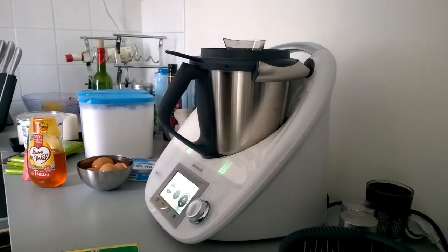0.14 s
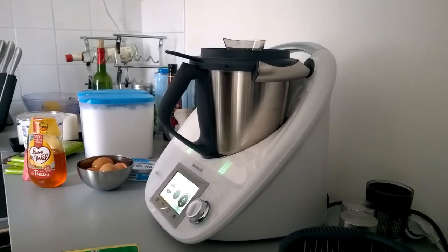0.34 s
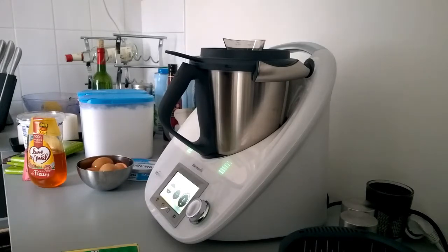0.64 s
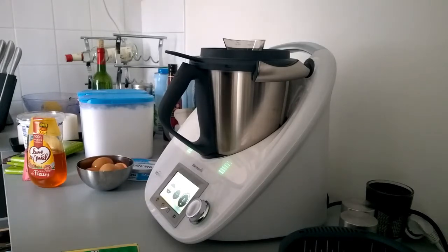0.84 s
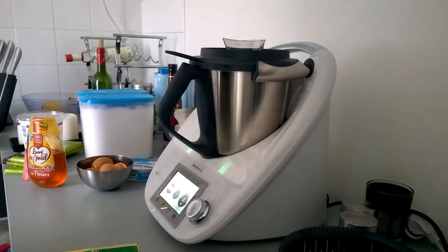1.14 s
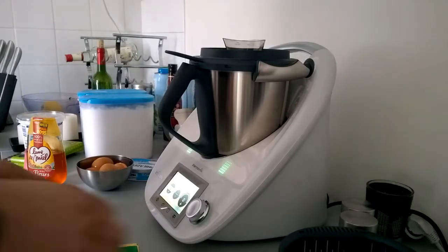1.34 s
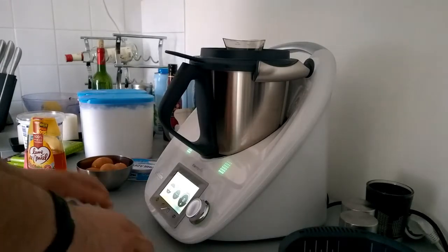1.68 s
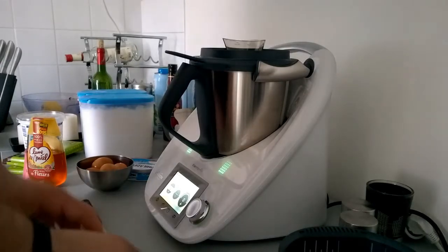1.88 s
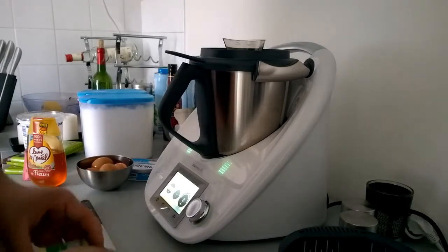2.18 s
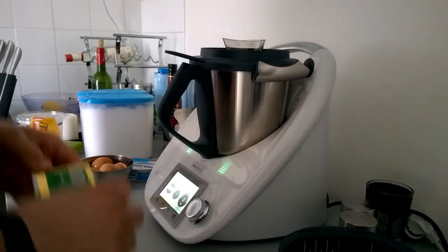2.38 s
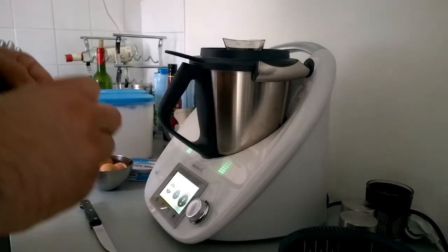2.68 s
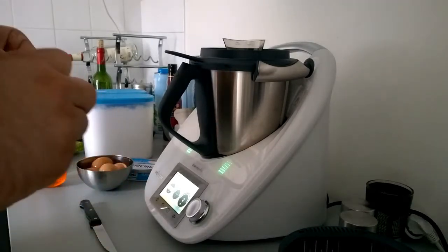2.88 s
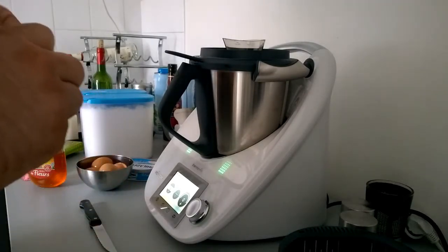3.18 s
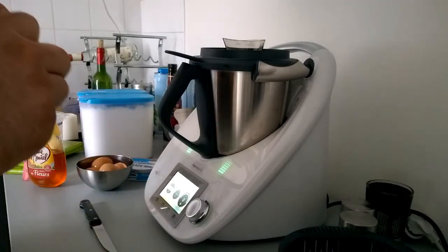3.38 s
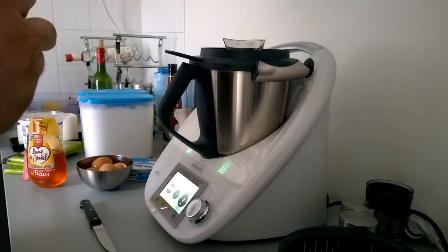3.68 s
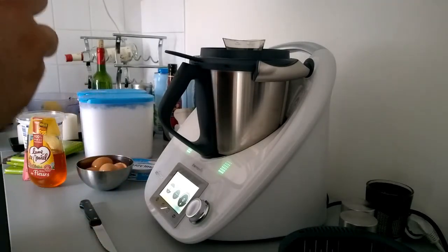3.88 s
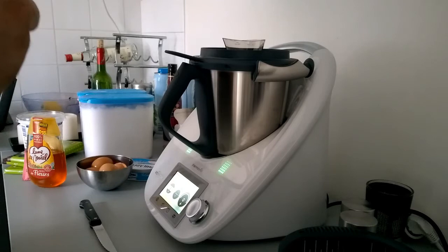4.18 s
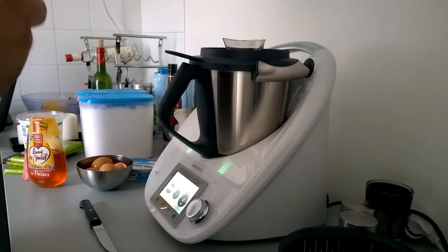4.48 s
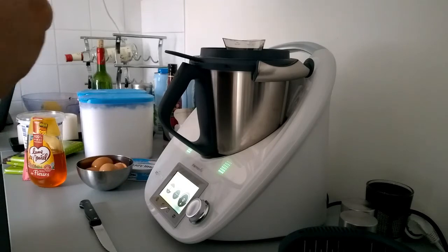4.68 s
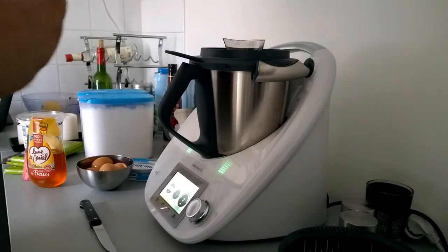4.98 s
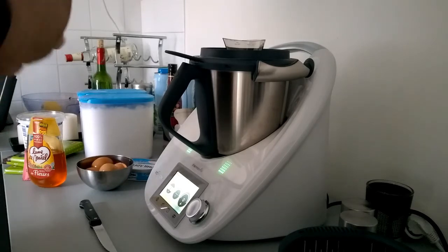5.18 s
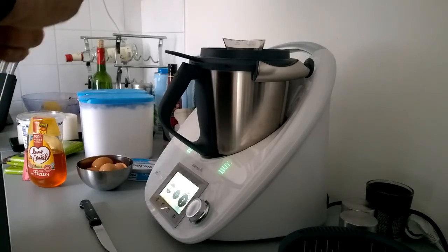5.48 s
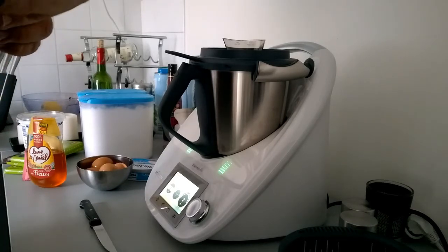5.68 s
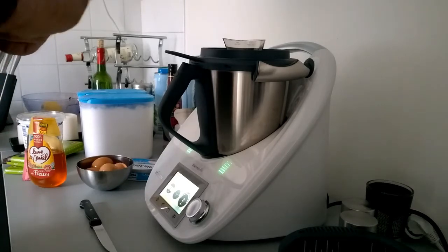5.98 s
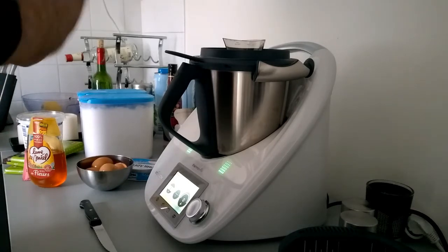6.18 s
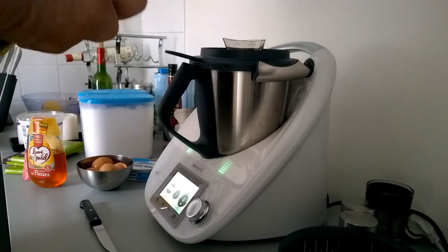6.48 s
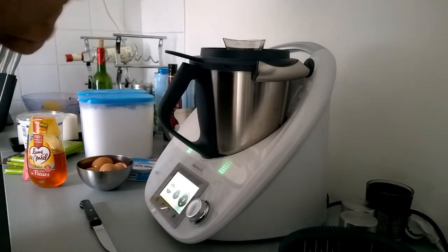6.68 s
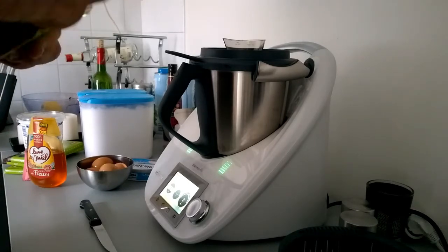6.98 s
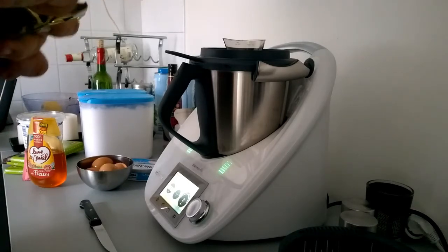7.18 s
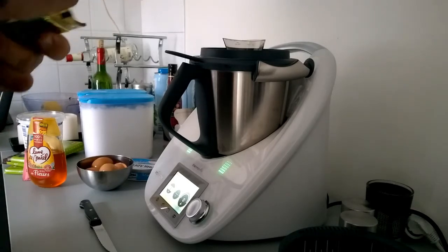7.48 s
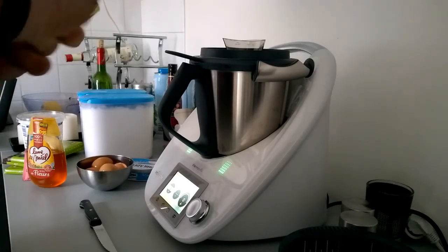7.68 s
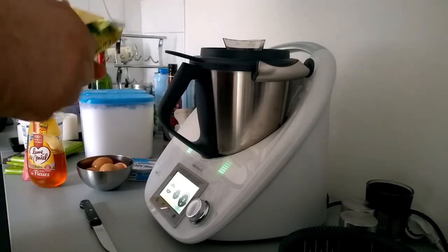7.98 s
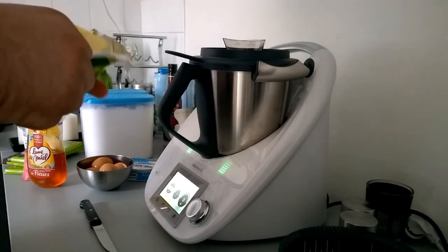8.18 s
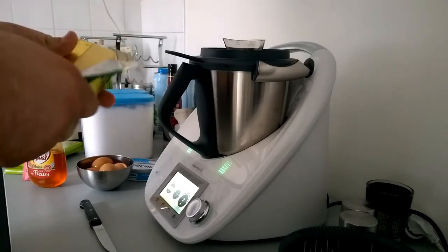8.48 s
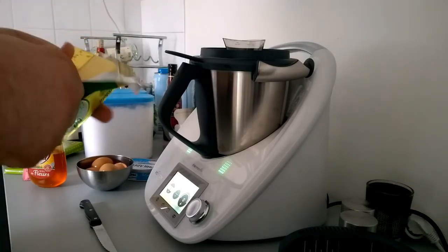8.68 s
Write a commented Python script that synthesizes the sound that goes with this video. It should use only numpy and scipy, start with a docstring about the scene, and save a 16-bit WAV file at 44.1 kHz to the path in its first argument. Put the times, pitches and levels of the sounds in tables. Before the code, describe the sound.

Wooden drawer knocks and steel chinks, a short slide on the worktop, then long uneven crackling of a foil wrapper, close up in a tiled room.

```python
"""Fingers work a stiff foil wrapper open: sharp single creases snap over a finer crackle of tiny ones.
Before that a cutlery drawer is pulled, rummaged in and shut, and a knife and a packet knock and slide on the
counter: short bursts ring wood and steel, streams of tiny contacts scrape, and a low rumble swells with a slide.
The tiled kitchen hums low and echoes the handled things; two close microphones hear it, the left a little earlier."""
import sys
import numpy as np
from scipy import signal
from scipy.fft import rfft, irfft, next_fast_len
from scipy.io import wavfile
from scipy.ndimage import map_coordinates

SR = 44100
rng = np.random.default_rng(int(sys.argv[2]) if len(sys.argv) > 2 else 0)


def unload_wav(signal):
    """Save mono or channel-first audio to the path in sys.argv[1] as 16-bit WAV at rate SR, clipped to [-1, 1]."""
    wavfile.write(
        sys.argv[1],
        SR,
        np.round(np.clip(np.atleast_2d(signal).T, -1, 1) * 32767).astype(np.int16),
    )


def linear_from_db(decibels):
    """Turn decibels (scalar or array-like) into linear amplitude factors; 0 gives 1."""
    return 10 ** (np.asarray(decibels, float) / 20)


N = 390285  # samples


def unit(x):
    """Scales a sound to rms 1."""
    return x / np.sqrt(np.mean(x ** 2) + 1e-20)


def peak1(x):
    """Scales a sound to peak 1."""
    return x / np.abs(x).max()


def power_db(*levels_db):
    """Level of unrelated sounds together: their powers add."""
    return 10 * np.log10(sum(linear_from_db(db) ** 2 for db in levels_db) + 1e-14)


def along(points, hz):
    """Reads a curve of (f/Hz, value) points on a log frequency axis."""
    f, v = np.transpose(points)
    return np.interp(np.log(hz + 1), np.log(f + 1), v)


def curves(rows, silent=-120):
    """Draws straight lines through the rows: one value per sample for each column after the time."""
    s, *cols = np.transpose(rows)
    return [np.interp(np.arange(N) / SR, s, c, silent, silent) for c in cols]


def wobble(rate):
    """A smooth random curve with rate knots a second."""
    coarse = np.arange(0, N + 32, 32)
    knots = rng.standard_normal(int(N * rate / SR) + 4)
    return np.interp(np.arange(N), coarse, map_coordinates(knots, [coarse * rate / SR]))


def filtered(x, response):
    """Multiplies the spectrum of x by a complex response of frequency."""
    m = next_fast_len(N + SR // 2)
    return irfft(rfft(x, m) * response(np.fft.rfftfreq(m, 1 / SR)), m)[..., :N]


def band(x, lo_hz, hi_hz):
    """Keeps mainly the part of x between two frequencies."""
    return signal.sosfilt(signal.butter(2, [lo_hz, hi_hz], "bandpass", fs=SR, output="sos"), x)


def struck(burst, hz, q):
    """A short burst rings one damped resonance, peak 1."""
    return peak1(signal.lfilter(*signal.iirpeak(hz, q, SR), burst))


def rung(x, modes):
    """Sends x through side-by-side resonances of (f/Hz, width f/Hz, level/dB), with alternating signs."""
    out = 0
    for k, (hz, width, db) in enumerate(modes):
        out = out + (-1) ** k * linear_from_db(db) * signal.lfilter(*signal.iirpeak(hz, hz / width, SR), x)
    return out


def grains(spectrum, rate, spread_db, smooth):
    """Random tiny contacts of uneven size, rate a second, over a share of smooth friction noise; rms 1."""
    happens, sign, size = rng.random((3, N))
    ticks = (happens < rate / SR) * np.sign(sign - .5) * linear_from_db(-spread_db * np.log(size + .003))
    rough = unit(ticks) + smooth * rng.standard_normal(N)
    return unit(filtered(rough, lambda hz: linear_from_db(along(spectrum, hz))))


def dulled(x, db, full_db):
    """Gentle contact is dull: the treble fades as the level falls below full_db."""
    treble = band(x, lo_hz=6500, hi_hz=19000)
    soft = signal.sosfilt(signal.butter(4, 6500, fs=SR, output="sos"), x)
    treble_db = np.clip(0.39 * (db - full_db), -30, 0)
    return linear_from_db(db) * (soft + linear_from_db(treble_db) * treble)


def add(track, s, sound):
    """Lays a sound into the track at s seconds."""
    start = round(s * SR)
    track[start:start + len(sound)] += sound


# how alike diffuse sound is at the two microphones: f/Hz, likeness (1 = the same)
LIKENESS = [(60, 0.86), (290, 0.81), (640, 0.53), (1400, 0), (15000, 0.26)]


def pair(spectrum):
    """Diffuse stereo noise of rms 1: shared and opposite parts mix to set how alike the sides are."""
    def mix(hz):
        turn = np.arccos(np.clip(along(LIKENESS, hz), -1, 1)) / 2
        return linear_from_db(along(spectrum, hz)) * [np.cos(turn), np.sin(turn)]

    mid, side = filtered(rng.standard_normal((2, N)), mix)
    return unit(np.array([mid + side, mid - side]))


# colour of the quiet air noise: f/Hz, relative level/dB
AIR_NOISE = [(20, -14.5), (68, -23), (115, -2.5), (178, -13), (398, -10.5), (477, -9.5), (726, -15.5),
             (795, -15), (1450, -26.5), (1810, -29.5), (2050, -31), (2560, -40.5), (4400, -31.5),
             (6500, -41), (9000, -51.5), (11700, -108), (19800, -120)]
# appliance tones: f/Hz, level/dB before a shared lift and wavering
APPLIANCE_TONES = [(174, -63), (307, -62), (334, -63), (433, -62), (536, -59), (592, -63)]
# low rumble over time, swelling near 1.9 s as things slide on the counter, and mains hum before its lift;
# both then waver: t/s, low rumble level/dB, mains hum level/dB
RUMBLE_AND_MAINS = [(0, -52, -80), (.8, -52, -50.5), (1.25, -67, -50), (1.5, -55, -75), (1.9, -36.5, -62.5),
                    (2.3, -51.5, -64.5), (3, -51, -62.5), (4.4, -52, -67.5), (5.2, -51, -57),
                    (6.2, -55.5, -74), (7.4, -56.5, -64.5), (8.85, -61, -62)]


def hum_and_low_rumble():
    """Air noise, mains hum and wavering appliance tones, and a low rumble that swells with a counter slide."""
    rumble_db, mains_db = curves(RUMBLE_AND_MAINS)
    t = np.arange(N) / SR
    hum = 0
    for hz, db in APPLIANCE_TONES:
        level = linear_from_db(db + 1 + 1.7 * wobble(3.3))
        hum = hum + level * np.sin(2 * np.pi * hz * t + 0.88 * wobble(3.2))
    mains = linear_from_db(mains_db + 3 + 2.5 * wobble(6)) * np.sin(2 * np.pi * 99.5 * t + .9 * wobble(5))
    # f/Hz, relative level/dB: a narrow hump near 71 Hz
    low = pair([(15, -8), (45, -3), (60, -6), (66, -5), (71, 10), (77, -6), (110, -10), (130, -40), (300, -110)])
    rumble = linear_from_db(rumble_db + 0.5 * wobble(3.3)) * low
    return linear_from_db(-51.5) * pair(AIR_NOISE) + rumble + hum + mains


# resonances of cupboard and counter: f/Hz, width f/Hz, level/dB
CUPBOARD = [(96.4, 22, -0.5), (137, 33, -2), (346, 385, -9.5)]
# wooden knocks of drawer and counter, levels before shared offsets:
# t/s, level/dB, panel ring f/Hz, relative thud level/dB, relative crack level/dB
WOOD_KNOCKS = [(.045, -33.5, 430, -29.5, -6), (0.07, -30.5, 990, -5, -24), (.162, -14.5, 380, -30, -20.5),
               (.176, -13, 830, -6, -7.5), (.189, -17.5, 1030, -14, -9.5), (.236, -5.5, 810, -38, -31),
               (.256, -18, 691, -32.5, -3), (.308, -25.5, 820, -25.5, -19), (0.438, -16, 1520, -26, -10),
               (.479, -9, 900, -39, 6.5), (0.491, -10.5, 970, -21, -18.5), (0.566, -27.5, 403, -7.5, 10),
               (.682, -5.5, 1080, -15, -34), (.698, -15.5, 610, -7, -47), (1.372, -46.5, 563, 10.5, -25),
               (1.538, -18, 1080, -5, -2.5), (1.582, -7.5, 1060, -8, -9.5), (1.61, -23.5, 1390, -9, -6),
               (1.625, -21, 1140, 0, -30), (1.763, -8, 1000, -21, -13), (1.8, -22.5, 960, -23, -19),
               (1.824, -21, 935, -14, -17), (1.859, -23, 860, 0, -5), (2.017, -29.5, 1280, -24, -2),
               (2.039, -25.5, 1264, -11, 9)]


def knocks():
    """A hard first touch and a rough contact ring the panel, thud in the cupboard and crack at the edge."""
    out, t = np.zeros(N + SR), np.arange(SR // 8) / SR
    noises = rng.standard_normal((len(WOOD_KNOCKS), len(t)))
    for (s, db, hz, thud_db, crack_db), noise in zip(WOOD_KNOCKS, noises):
        burst = noise * np.exp(-t / .002)  # the contact chatters for about 2 ms
        touch = band(burst + 12 * (t == 0), lo_hz=60, hi_hz=2580)  # wood cushions the blow
        panel = struck(touch, hz, q=3.4) + .5 * peak1(band(touch, lo_hz=285, hi_hz=2515))
        thud = linear_from_db(thud_db + 1) * peak1(rung(touch, CUPBOARD))
        crack = peak1(band(burst, lo_hz=1810, hi_hz=5840))
        crack = crack + 0.33 * peak1(band(burst, lo_hz=6000, hi_hz=16300))
        add(out, s, linear_from_db(db + 4.0) * (panel + thud + linear_from_db(crack_db - 1) * crack))
    return out[:N]


# colour of wood scraping on wood: f/Hz, relative level/dB
SCRAPE_COLOUR = [(150, -46), (250, -18.5), (360, -2.5), (657, -4.5), (793, -3.5), (1460, -0.5),
                 (1780, -34.5), (3000, -23.5), (3900, -59.5), (6600, -120)]
# colour of loose things rattling: f/Hz, relative level/dB
RATTLE_COLOUR = [(1180, -33), (2000, -7.5), (2500, -5.5), (4710, -14), (7190, -17.5), (8330, -14.5),
                 (15100, -17.5), (15800, -37.5)]
# strokes of runners and sliding things, scrape and rattle before their flutter:
# start t/s, length t/s, scrape level/dB, rattle level/dB, counter rumble level/dB
SLIDE_STROKES = [(0.06, 0.22, -40.5, -46.5, -56), (0.188, 0.075, -30, -28, -48),
                 (0.462, 0.031, -23.5, -24, -40), (0.536, 0.092, -32.5, -33, -54),
                 (0.654, 0.2, -43.5, -56.5, -58), (0.895, 0.54, -56, -73, -49.5),
                 (1.362, 0.19, -60, -61.5, -57), (1.605, 0.106, -35.5, -52.5, -33),
                 (1.768, .17, -37, -43, -36), (2.003, 0.069, -51, -40.5, -44),
                 (2.11, 0.083, -56.5, -58, -63)]


def slides():
    """Wood scrapes, loose things rattle, the counter rumbles underneath; each stroke rises, holds and falls."""
    rise_s, fall_s = 0.016, 0.028
    t = np.arange(N) / SR
    start, length, *levels = np.transpose(SLIDE_STROKES)[:, :, None]
    short = t[:3 * SR:40]  # the strokes all lie in the first 3 s
    rise = np.minimum((short - start) / rise_s, 0)
    fall = np.minimum((start + length - short) / fall_s, 0)
    shape_db = 20 * np.log10(np.exp(rise + fall) + 1e-9)
    scrape_db, rattle_db, rumble_db = (np.interp(t, short, power_db(*(db + shape_db))) for db in levels)
    flutter_db = 4 * wobble(70)
    scrape = linear_from_db(scrape_db + 1.9 * wobble(60)) * grains(SCRAPE_COLOUR, rate=600, spread_db=4, smooth=0.21)
    loose = grains(RATTLE_COLOUR, rate=3300, spread_db=0.0, smooth=0.84)
    rattle = dulled(loose, rattle_db + flutter_db, full_db=-30)
    rubbing = band(rng.standard_normal(N), lo_hz=50.3, hi_hz=594)
    return scrape + rattle + linear_from_db(rumble_db) * unit(rung(rubbing, CUPBOARD))


# ringing tones of the cutlery set: f/Hz, relative level/dB, time to fall by 60 dB t/s
STEEL_TONES = [(4323, -6, .16), (5416, -3, .12), (7138, -4, .09), (7456, -6, .1), (8904, -14, .2),
               (9658, -16, .2), (11290, -15, .2), (11750, -12, .11), (12640, -14, .19), (13480, -7, .22),
               (14600, -3, .14)]
# chinks: t/s, level/dB before a shared lift, centre of the struck piece f/Hz, spread/octaves
CUTLERY_CHINKS = [(0.148, -27, 4340, 0.17), (.228, -24, 7240, .15), (.256, -31, 7500, 0.27),
                  (0.605, -20.5, 7450, 0.37), (.607, -23, 14000, .2), (0.611, -22, 5416, .15),
                  (.612, -18.5, 4323, .15), (0.621, -21.5, 10200, 0.3)]


def cutlery():
    """Each chink rings mostly the steel tones near those of the piece that was hit."""
    out, t = np.zeros(N + SR), np.arange(SR // 3) / SR
    hz, level, t60 = np.transpose(STEEL_TONES)[:, :, None]
    lucks_db = rng.standard_normal((len(CUTLERY_CHINKS), len(STEEL_TONES), 1))
    onset = 1 - np.exp(-t / 0.00064)
    for (s, db, centre, spread), luck_db in zip(CUTLERY_CHINKS, lucks_db):
        near_db = -8 * (np.log2(hz / centre) / spread) ** 2
        ring = linear_from_db(level + near_db + luck_db - 60 * t / t60) * np.sin(2 * np.pi * hz * t)
        add(out, s, linear_from_db(db + 0.5) * ring.sum(0) * onset)
    return out[:N]


def settling(levels_db):
    """Level in dB that jumps at each crease and dies away as the foil settles."""
    settle_s = .015
    starts = np.round(np.transpose(FOIL_CREASES)[0] * SR).astype(int)
    kicks = np.bincount(starts, linear_from_db(levels_db) ** 2, N)
    return 10 * np.log10(signal.lfilter([1], [1, -np.exp(-2 / (settle_s * SR))], kicks) + 1e-14)


# colour of the fine foil crackle: f/Hz, relative level/dB
FOIL_COLOUR = [(1200, -18), (1800, -7.5), (3100, 2), (4340, -9), (6000, -8.5), (9000, -8.5), (15000, -17.5)]
# resonances of the hollow packet: f/Hz, width f/Hz, level/dB
PACKET_HOLLOW = [(435, 480, 0.5), (1030, 420, 8), (1633, 590, -2.5)]
# pull of the fingers on the wrapper: t/s, crackle level/dB before shared offsets
FINGER_PULL = [(2.2, -50.5), (2.53, -63.5), (3.31, -94), (3.66, -44), (4.03, -50.5), (4.94, -42),
               (5.16, -56.5), (5.68, -52.5), (6.0, -53.5), (6.2, -40), (6.5, -59.5), (6.76, -45),
               (7.2, -66), (7.42, -43), (8.35, -53), (8.46, -55), (8.72, -68), (8.85, -44)]


def crumple():
    """Many tiny creases crackle in clumps, under the pull and after each big crease; the hollow rings along."""
    pull_db, = curves(FINGER_PULL)
    _, db, pop_db, low_db, _ = np.transpose(FOIL_CREASES)
    crackle_db = power_db(pull_db - 8.0, settling(power_db(db, db + low_db) - 19))
    body_db = power_db(pull_db - 13.5, settling(db + pop_db - 7))
    clumps_db = 3 * wobble(45)
    # f/Hz, relative level/dB
    body_colour = [(200, -25), (2200, 7.5), (5000, -43), (9000, -100)]
    body = unit(rung(grains(body_colour, rate=360, spread_db=5.5, smooth=1.0), PACKET_HOLLOW))
    fine = grains(FOIL_COLOUR, rate=1200, spread_db=4.5, smooth=0.17)
    crackle = dulled(fine, crackle_db + clumps_db, full_db=-32.5)
    return crackle + linear_from_db(body_db + clumps_db) * body


# resonances of stiff foil facets, the two large ones first: f/Hz, width f/Hz, level/dB before scatter
FOIL_FACETS = [(2100, 1100, -1), (3130, 900, 0), (4350, 1000, 0), (5500, 1500, -1), (6800, 2000, -3)]
# big creases of the wrapper, levels before shared offsets: t/s, level/dB,
# then relative to it: hollow pop level/dB, large facets level/dB, fizz level/dB
FOIL_CREASES = [(2.3342, -43, -7, -16, -11.5), (2.4512, -55.5, 3, 0, -18), (2.5818, -60.5, 8.5, -8.5, -26),
                (2.7636, -32.5, -29, -13, -14), (2.8026, -18.5, -44, -14, -20),
                (2.8702, -34, -31, -20, -12), (2.9022, -29.5, -37, -11, -13),
                (3.1509, -39.5, -37, -34, -18), (3.2049, -42.5, -31, -29, -14), (3.2574, -57, -11, 1, -17),
                (3.4076, -31.5, -31, -28, -14), (3.4408, -21.5, -32, -23, -14),
                (3.467, -21.5, -14.5, -4.5, -15), (3.6105, -31, -17, 8.5, 4.5),
                (3.7299, -30.5, -25, -9, -17), (3.7688, -30.5, -36, -4.5, -34),
                (3.8339, -25, -17, -12.5, -25), (3.8575, -32, -2.5, -2, -15),
                (3.9755, -38, -1.5, -0.5, -27), (4.0782, -46, -7, 2.5, -24), (4.1684, -47.5, 8, -1, -27),
                (4.1783, -33, -9, 3.5, -34), (4.2065, -38, -7, 3, -13), (4.2304, -22, -18, -5.5, -16),
                (4.2477, -25.5, -24, -9, -12), (4.2592, -15, -29, -25, -23), (4.276, -23.5, -18, -10, -11),
                (4.291, -20.5, -10.5, -17, -10.5), (4.3141, -28.5, -8, 0.5, -12),
                (4.3477, -29.5, -9.5, 5, -15), (4.5067, -37.5, -16, 4.5, -23),
                (4.5263, -28, -12.5, -6, -21), (4.5584, -41.5, 0.5, 6.5, -19), (4.571, -34, -23, -3, -12.5),
                (4.6568, -29, -47, -1, -29), (4.7355, -27.5, -35, -10, 3), (4.801, -22, -13, -4, -15),
                (4.8168, -27, -8, -13, -5.5), (4.8294, -19.5, -10.5, -9, -17),
                (4.8851, -23.5, -18, 1.5, -5), (5.0182, -28, -11, -7, -13), (5.034, -25.5, -13, -5, -26),
                (5.0716, -35.5, 1.5, -10, -22), (5.0936, -37, -4, -5, -28), (5.2275, -44, -4, 1, -25),
                (5.382, -41, 0, 2, -32), (5.5196, -25.5, -27, -9.5, -17), (5.6084, -40.5, -10, -17, -21),
                (5.6515, -36.5, -20, -4, -17), (5.6712, -28.5, -10.5, -7.5, -15),
                (5.7038, -32, -25, 1, -2.5), (5.9782, -30.5, -2.5, -3.5, -26), (6.0227, -30, 0, -5, -0.5),
                (6.0385, -18.5, -13, -11, -8), (6.122, -36, 0, 10, -17), (6.2424, -36, -13, 8, 1),
                (6.248, -24, -7.5, -0.5, -17), (6.2542, -20.5, -18, -9, -30), (6.3943, -28, -18, -4, -16.5),
                (6.6051, -48, 10, -5, -25), (6.6356, -40, -2, 8, -14), (6.6466, -19, -35, -2, -22),
                (6.6487, -22.5, -2.5, -24, -6.5), (6.8145, -29, 2.5, 5.5, -21), (6.942, -48, 4.5, 8, -30),
                (6.9838, -57, 8, 8, -18), (7.0382, -48.5, -7, 2.5, -18), (7.1784, -43, 1.5, 10, -26),
                (7.2407, -34.5, -4, 2, -21), (7.2848, -21.5, -9.5, -2, -9), (7.45, -22, -4.5, -6.5, -18.5),
                (7.5241, -34.5, -7.5, -8, -1.5), (7.5498, -32.5, -8, 3.5, -14),
                (7.5691, -38.5, 7, -14.5, -4), (7.5882, -33.5, 6, 0, -17), (7.6135, -26.5, -2.5, 3.5, -4.5),
                (7.7024, -44, 14.5, -4, -23), (7.7152, -50, 16, 1, -20), (7.7526, -18, -6.5, -19.5, -16.5),
                (7.783, -36.5, -0.5, 4, -9), (7.8023, -37, 5.5, 1, -3), (7.9548, -17, -12.5, -10.5, -12.5),
                (7.9755, -27, -12, -24, -22), (8.0332, -54.5, 27, 31, -1), (8.1619, -31.5, 3.5, -1, -14),
                (8.2094, -31.5, -1.5, -8, -12), (8.2249, -31, 4.5, -4.5, -5),
                (8.3042, -18, -15.5, -10, -17), (8.3887, -26, -3, -4, -4), (8.6634, -45, -28, 1.5, -25),
                (8.7123, -19, -20, -15, -6), (8.7361, -9.5, -23, -18, -16.5),
                (8.7615, -16.5, -8, -0.5, -19), (8.7697, -12, -17, -4, -17), (8.7802, -15.5, -4.5, -2, -10),
                (8.8364, -29.5, 6, -2, -19)]


def creases():
    """A crease flips at once with a short after-rattle; facets and hollow ring, each crease tuning them a little."""
    direct_db, large_db, pop_lift_db, fizz_lift_db = 6.5, 2, -0.5, 7.5
    facet_scatter_db = 2.5  # each crease moves some facets more than others
    out, t = np.zeros(N + SR), np.arange(SR // 40) / SR
    noise = rng.standard_normal((len(FOIL_CREASES), len(t)))
    flips = .17 * noise * np.exp(-t / .0018)
    flips[:, 0] = 1
    # the larger the part that moves, the softer the flip it feels
    felt_large = band(flips, lo_hz=1090, hi_hz=5270)
    felt_small = band(band(flips, lo_hz=2430, hi_hz=9300), lo_hz=1530, hi_hz=8700)
    felt_fizz = band(flips, lo_hz=6700, hi_hz=13950)
    felt_hollow = band(flips, lo_hz=260, hi_hz=2420)
    lucks = noise[:, -6:]  # five facet levels and one tuning
    rows = zip(FOIL_CREASES, felt_large, felt_small, felt_fizz, felt_hollow, lucks)
    for (s, db, pop_db, low_db, fizz_db), low, high, fizz, pop, luck in rows:
        tune = [1 + .09 * np.tanh(luck[-1]), 1, 1]
        facets = np.multiply(FOIL_FACETS, tune) + np.outer(facet_scatter_db * luck[:-1], [0, 0, 1])
        snap = peak1(rung(high, facets[2:]))
        snap = snap + linear_from_db(low_db + large_db) * peak1(rung(low, facets[:2]))
        snap = snap + linear_from_db(fizz_db + fizz_lift_db) * peak1(fizz)
        snap = snap + linear_from_db(pop_db + pop_lift_db) * peak1(rung(pop, np.multiply(PACKET_HOLLOW, tune)))
        add(out, s, linear_from_db(db + direct_db) * snap)
    return out[:N]


# how long the room rings: f/Hz, time to fall by 60 dB t/s
ROOM_DECAY = [(100, 0.39), (800, 0.31), (2100, 0.28), (5500, 0.33), (14600, 0.19)]
# near echoes before shift, lead and shared offset: left delay t/s, right delay t/s, level/dB
NEAR_ECHOES = [(.0011, .0013, -11), (.0019, .0021, -12), (.0030, .0029, -6), (.0037, .0036, -11),
               (.0044, .0043, -6.5), (.0053, .0056, -11), (.0068, .0064, -12), (.0093, .0088, -13),
               (.0118, .0122, -11)]
# colour of the direct sound: f/Hz, level/dB to be multiplied by 4 at the left and by 3 at the right
DIRECT_COLOUR = [(500, -0.5), (1500, 0.5), (15000, -0.5)]


def kitchen(x, tail_db, lead):
    """Direct sound (left first by lead s), near echoes and a tail; the last two change as the hands move about."""
    def direct(hz):
        return np.array([linear_from_db(along(DIRECT_COLOUR, hz) * (4.0 - ear)) * np.exp(-2j * np.pi * hz * lead * ear)
                         for ear in (0, 1)])

    echo_shift_s, build_s = .0004, .014
    out = np.pad(filtered(x, direct), ((0, 0), (0, 2 * SR)))
    step, size = SR // 4, 2 * SR // 5  # new echoes and tail every quarter second
    left, right, echo_db = np.transpose(NEAR_ECHOES)
    for start in range(0, N, step):
        hz, t, z = signal.stft(rng.standard_normal((2, size)), SR, nperseg=256)
        share = np.clip(along(LIKENESS, hz), 0, 1)[:, None]  # long waves reach both microphones alike
        z[1] = share * z[0] + np.sqrt(1 - share ** 2) * z[1]
        decay = linear_from_db(-60 * t / along(ROOM_DECAY, hz)[:, None])
        tail = signal.istft(z * decay, SR, nperseg=256)[1]
        tail *= 1 - np.exp(-np.arange(tail.shape[1]) / SR / build_s)
        tail *= linear_from_db(tail_db) / np.linalg.norm(tail[0])
        shift = echo_shift_s * rng.uniform(-1, 1, len(NEAR_ECHOES))
        for ear, delay in enumerate((left, right + lead)):
            tail[ear, np.round(np.abs(delay + shift) * SR).astype(int)] += linear_from_db(echo_db - 1.5)
        wet = signal.fftconvolve(x[None, start:start + step], tail, axes=1)
        out[:, start:start + wet.shape[1]] += wet
    return out[:, :N]


def scene():
    """Drawer and wrapper sound in the kitchen, over air noise, hum and low rumble."""
    drawer = kitchen(knocks() + cutlery() + slides(), tail_db=-4.5, lead=0.000315)
    wrapper = kitchen(creases() + crumple(), tail_db=-5.5, lead=.00021)
    return drawer + wrapper + hum_and_low_rumble()


def top_cut(x):
    """Nothing passes above the cut-off."""
    return signal.sosfilt(signal.butter(12, 16810, fs=SR, output="sos"), x)


# colour of the microphones: f/Hz, left minus right level/dB
MICROPHONE_TILT = [(60, 1.5), (180, 0.5), (400, 4.5), (900, -3.5), (1400, -3.5), (5000, -3), (9000, -2.5),
                   (15000, -1.5)]


def record(dry):
    """The microphones differ in colour and round off the loudest peaks; a steep low-pass then cuts the top."""
    mix = filtered(dry, lambda hz: linear_from_db(along(MICROPHONE_TILT, hz) * np.array([[.5], [-.5]])))
    mix = mix / (1 + np.abs(mix / .9) ** 4) ** .25
    # the low-pass leaves little above about 15.8 kHz
    mix = filtered(mix, lambda hz: 1 / (1 + (hz / 15800) ** 60))
    return top_cut(mix)


dry = scene()
out = record(dry)
unload_wav(out)
```